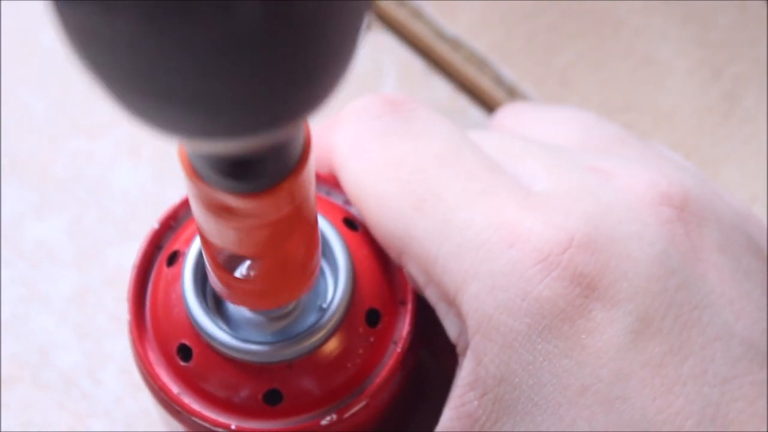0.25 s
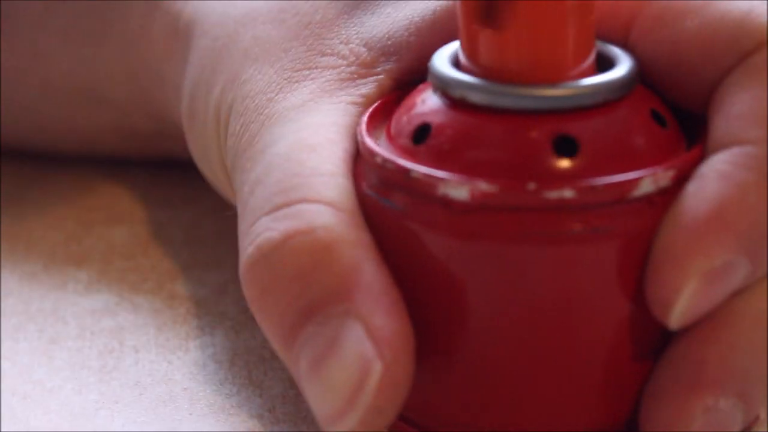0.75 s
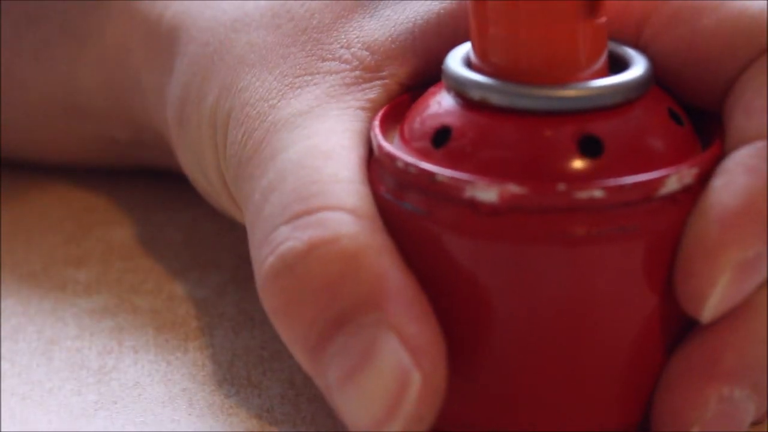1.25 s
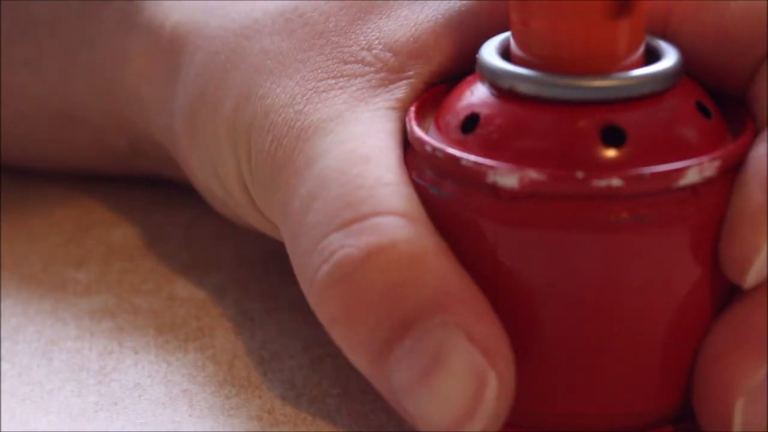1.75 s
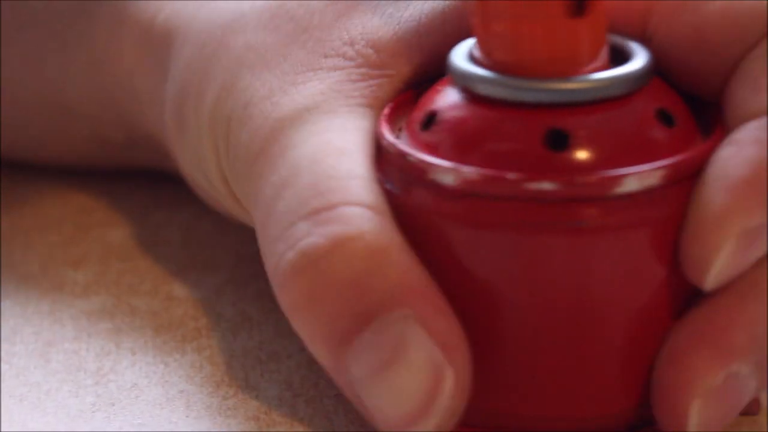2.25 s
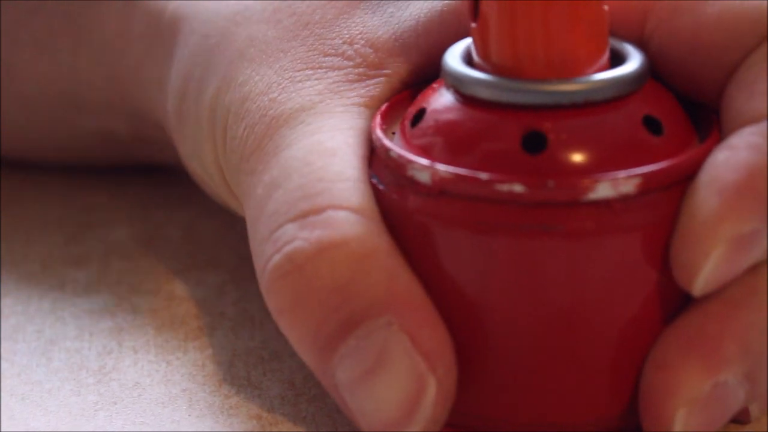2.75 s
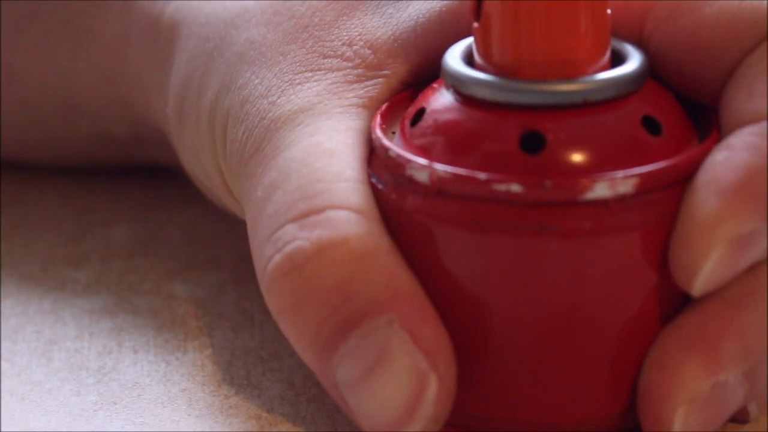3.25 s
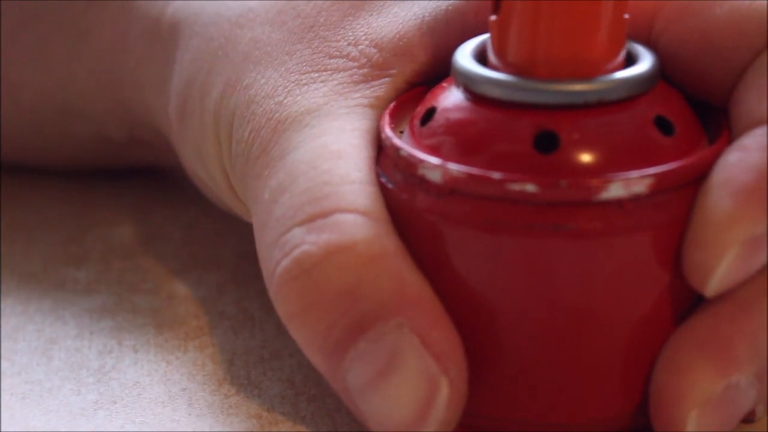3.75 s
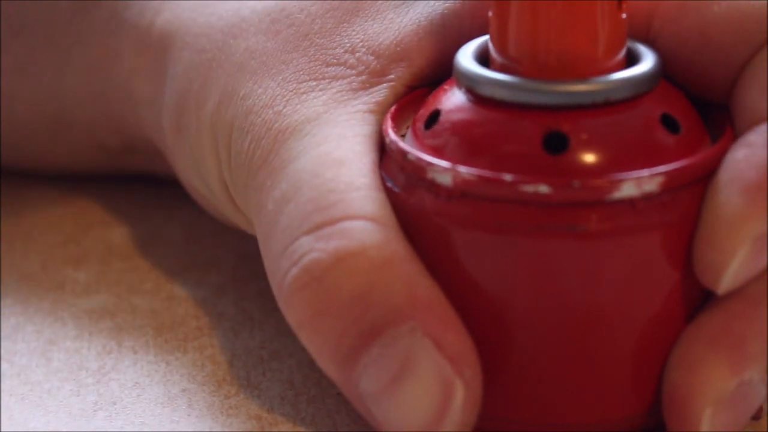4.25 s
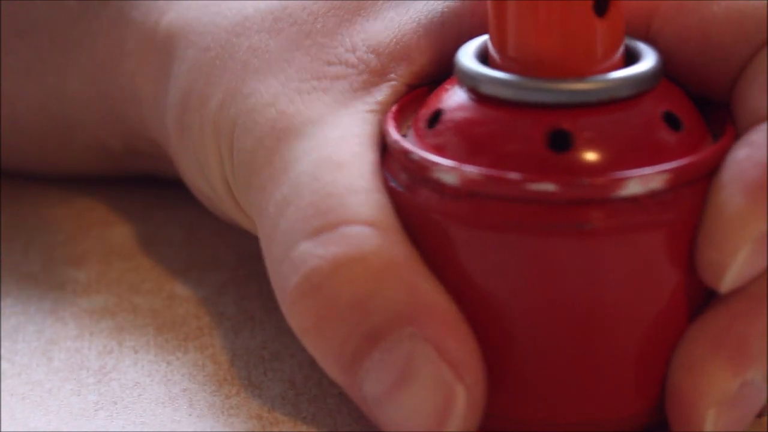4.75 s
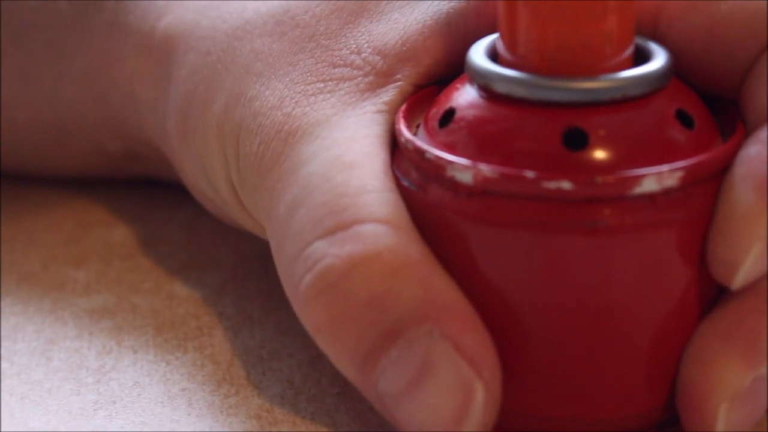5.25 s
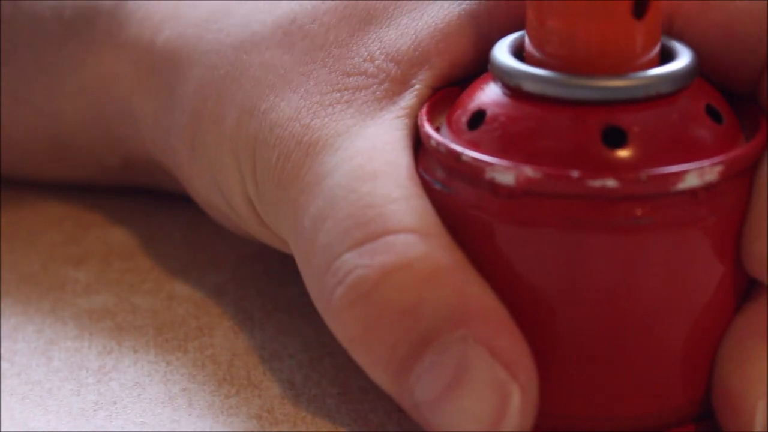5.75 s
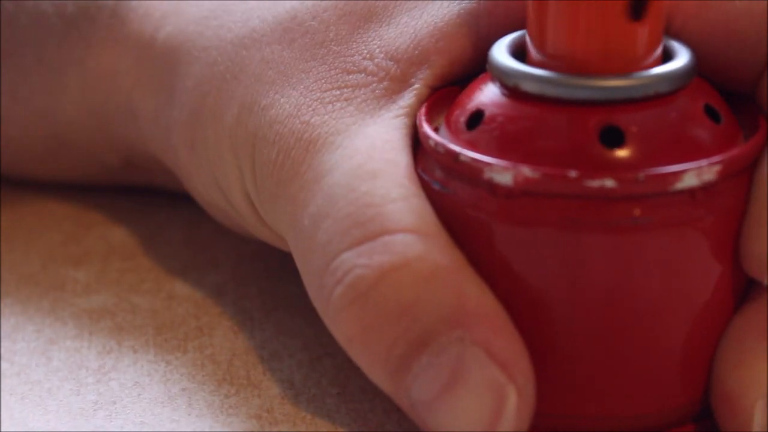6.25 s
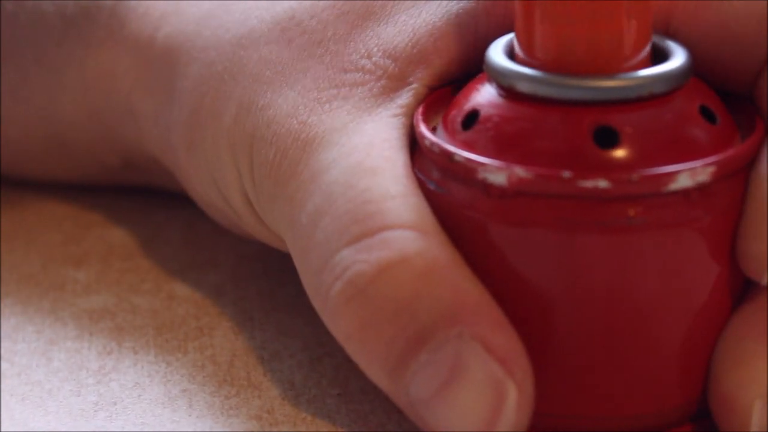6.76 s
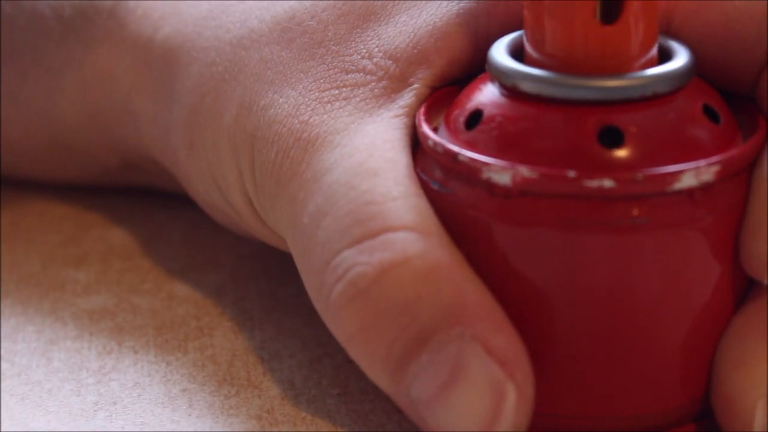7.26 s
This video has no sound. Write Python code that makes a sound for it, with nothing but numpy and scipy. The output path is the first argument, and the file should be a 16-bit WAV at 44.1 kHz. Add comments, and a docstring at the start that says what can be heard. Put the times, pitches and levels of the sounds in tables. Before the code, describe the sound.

Close to the microphone in a small, fairly dry room, a cordless drill revs up quickly from 0 s, its gear whine climbing to a bright, free-spinning pitch. Around 0.4-0.55 s a rough drone swells, snags clack and the pitch drops as the sound shifts leftward. From 0.55 to 2.3 s the hole saw grinds a thin metal can under load: loud wavering whine, gear rattle, gritty scrape and hollow rumble, with snags near 1.55 and 1.63 s and a hard clack at 2.32 s. A lighter pull winds down by 2.75 s. Until 4.8 s there are only quiet creeping scrapes, ticks and scattered metallic clicks, stronger near 3.95, 4.4 and 4.6 s. A short whir runs 4.85-5.45 s, ending in a sharp crack. From 5.6 s a last pull rises slowly, peaks around 6.2 s, then sags into a low, rough growl to 7.5 s, with dull table bumps.

```python
"""Hole saw in a can lid

A cordless drill turns a hole saw at the top of a thin metal can held on a table, close to the microphone.
First shot: the saw spins free. After a cross-fade to a second shot it cuts under load.
Brief nudges and further light trigger pulls follow; snagging teeth are bursts of decaying noise bands.
Motor speed and load set gear whine, rattle, scrape and rumble: whine and shaft are sines locked to the
motor angle; rattle, rumble and scrape are shaped noise and grains."""
import sys
import numpy as np
from scipy import signal
from scipy.fft import rfft, irfft
from scipy.io import wavfile

SR = 44100
rng = np.random.default_rng(int(sys.argv[2]) if len(sys.argv) > 2 else 0)


def master(y):
    """Save y as 16-bit WAV."""
    cut = np.clip(np.atleast_2d(y).T, -1, 1)
    pcm = np.round(cut * 32767)  # scale
    wavfile.write(sys.argv[1], SR, pcm.astype(np.int16))


N = 330750
TIME = np.arange(N) / SR

# Trigger held down, one table a surge from sag to sag. Each row: time in seconds, gear mesh in Hz, load in dB.
HARD_PULLS = [
    [(0.0, 601.3, 1.5), (0.05, 803.6, 6), (0.114, 1460, 5.5), (0.19, 1845, 1), (0.32, 2022, 0),
     (0.44, 2023, -4), (0.535, 1750, -1.5), (0.55, 1282, 6)],
    [(0.55, 1272, 9.5), (0.57, 1215, 4), (0.64, 1201, 5), (0.73, 1419, 0.5), (0.81, 1572, 0.5),
     (0.915, 1473, 1.5), (1.014, 1646, -1), (1.2, 1390, 1.5), (1.3, 1395, 1.5), (1.388, 1449, 0.5),
     (1.452, 1101, 2.5), (1.54, 961.5, 6.5), (1.58, 1097, 3), (1.632, 1001, 7)],
    [(1.632, 992, -7), (1.7, 1337, 2), (1.784, 1381, 1), (1.888, 1451, 1.5), (1.97, 1353, 1.5),
     (2.15, 1217, 5), (2.26, 1126, 5), (2.31, 830, 5)],
]
# Light trigger pulls, one table a pull. Each row: time in seconds, gear mesh in Hz, load in dB.
LIGHT_PULLS = [
    [(2.36, 1118, -4.5), (2.418, 1066, -0.5), (2.49, 1143, -2.5), (2.57, 1311, -3), (2.614, 1111, 0),
     (2.67, 961, -5), (2.71, 291.6, -4), (2.76, 30.1, -9)],
    [(4.84, 29.7, 14), (4.91, 761, -3), (5.03, 905, -1), (5.08, 1086, -4), (5.17, 1116, 1.5),
     (5.254, 1043, -1), (5.36, 815, 3.5), (5.42, 332, 3.5), (5.46, 173, 5)],
    [(5.61, 130, 11), (5.7, 444.5, 4.5), (5.82, 568.4, 1), (6.05, 1054, -3), (6.2, 1222, -3),
     (6.32, 1218, -1.5), (6.464, 1128, -0.5), (6.612, 1066, -1), (6.7, 960.5, -0.5), (6.8, 763.5, 1.5),
     (6.98, 536, 2.5), (7.28, 528, 3), (7.42, 619, 3), (7.5, 500, -2.5)],
]
# Teeth snagging on the rim. Each row: start in seconds, strength in dB, brightness in dB per octave,
# clack in Hz, extra ring in dB.
SNAGS = [(0.4133, -23.5, -3.5, 4063, -2), (0.4974, -18.5, 0, 1940, -6), (1.3122, -29, 2, 2620, 13.5),
         (1.4059, -29, 2.5, 2586, 14), (1.5481, -19, 0.5, 2048, -6), (1.6307, -13.5, -0.5, 3860, -6),
         (1.701, -24.5, 2.5, 2580, 7.5), (1.8831, -26.5, 1.5, 2670, 7.5), (2.2314, -28, -0.5, 2380, 4),
         (2.3212, -11.5, 0.5, 3670, -7), (2.545, -25, -2.5, 2581, -5), (2.6021, -28, 4.5, 2424, 4.5),
         (2.641, -30.5, -4.5, 2450, -4), (2.8143, -47, -7.5, 1900, 5), (2.828, -39, 2, 3270, 1),
         (2.8602, -33.5, 3.5, 2490, 8.5), (2.8674, -27.5, 3, 2590, -1), (2.9796, -32, 1.5, 2770, -2),
         (2.9933, -29, 1, 1940, 8), (3.1744, -40.5, -4.5, 2680, -1.5), (3.5184, -34, 3, 4460, 2.5),
         (3.539, -33.5, 2, 2700, 3), (3.6281, -50, -3, 2550, 8), (3.747, -40.5, -5.5, 1900, -4),
         (3.8062, -47, 4, 2450, 9), (3.819, -32.5, 1.5, 2620, -2), (3.8348, -28, 1, 2070, 3),
         (3.8645, -40, 1, 2530, -4), (3.9445, -19.5, 0, 2140, -4), (3.9658, -25, 6.5, 2590, 9.5),
         (3.9836, -28, -3.5, 2430, 1), (4.0865, -41, 1.5, 2820, -6), (4.3778, -22, 0, 2236, 0.5),
         (4.563, -33.5, -1, 2500, 3), (4.587, -25, 1, 4780, -3), (4.6015, -20.5, 0, 2960, -5),
         (4.76, -26, 3, 4000, -1.5), (4.811, -22, 0.5, 2520, -5), (4.8502, -24.5, 3.5, 1990, 1.5),
         (4.914, -23.5, -1.5, 2870, -1), (4.931, -29, -6, 2560, 5), (4.9382, -22, 6.5, 2020, 9),
         (4.9815, -36.5, 9.5, 2520, 11), (5.4705, -22, -1, 2478, -6), (5.474, -15, 3.5, 2680, 2.5),
         (5.5257, -27.5, -1.5, 1946, -9), (6.1024, -33.5, 5, 2729, -12), (6.1741, -28, 1.5, 3739, 1),
         (6.7057, -28.5, 0.5, 2678, 0), (6.8752, -40.5, 5.5, 2622, 15.5), (6.8977, -33, -4, 2710, 1.5),
         (7.0996, -31.5, 2, 2468, -3)]
# What a snag shakes: clack, ring, thump, body note, ping, crack, table. Each row: band edge over centre
# (a ratio, at least 1.05 in use), t60 in seconds, tail t60 in seconds, tail in dB, level in dB.
SNAG_PARTS = [(1.42, 0.0086, 0.2, -15, -14), (1.26, 0.018, 0.21, -15, -10), (1.64, 0.035, 0.14, -23, -17),
              (1.04, 0.064, 0.075, -18, -23), (1.21, 0.0069, 0.12, -22, -26),
              (1.3, 0.0046, 0.063, -35, -27), (1.71, 0.075, .22, -15, -22)]
# Gear rattle in the housing, slow and fast. Each row: frequency in Hz, relative density in dB per Hz.
GEARS_SLOW = [(410, -41), (700, -15.5), (967, -12), (1090, 1), (1230, -5), (1410, -4.5), (1630, -10),
              (1790, -6.5), (2150, -11.5), (2290, -4.5), (2630, -1), (3070, -10.5), (3630, -8.5),
              (4040, -30), (4400, -19), (5720, -40), (9680, -120)]
GEARS_FAST = [(410, -25), (700, -5.5), (930, -8.5), (1180, 0), (1300, -8.5), (1380, -1.5), (1730, -3.5),
              (2240, -4.5), (2630, -1), (3020, -10.5), (4400, -11), (5720, -7), (9680, -120)]
# Resonances of the can. Each row: frequency in Hz, relative density in dB per Hz.
CAN_BODY = [(18, -53), (30, -25), (76, -14), (118, -1), (156, -5), (198, 2), (252, -2.5), (319, -2),
            (357, -7), (411, -4.5), (459, 4.5), (574, -4), (689, 0.5), (793, -0.5), (850, 0.5), (1100, -12),
            (1870, -120)]
# Scraping teeth, loaded and running free. Each row: frequency in Hz, relative density in dB per Hz.
SCRAPE_LOADED = [(2240, -11), (3800, 2.5), (3920, -1), (4130, 0.5), (4610, -0.5), (4980, 0.5), (5390, 0),
                 (5930, -5.5), (6930, -7), (9090, -11.5), (13600, -29), (14800, -22.5), (16000, -58)]
SCRAPE_FREE = [(2240, -11), (3800, -9), (3940, -10), (4260, -13.5), (5230, -7), (6220, -2.5), (7060, -9.5),
               (7870, -10), (10900, -19.5), (11700, -21), (12700, -25), (15200, -22), (16000, -29)]
# Singing rim of the can. Each row: frequency in Hz, relative density in dB per Hz.
RIM = [(300, -51), (850, -9), (1140, 9.5), (1500, -15), (2000, -5.5), (2650, -1.5), (3600, -29.5),
       (6000, -13)]
# Quiet room noise. Each row: frequency in Hz, relative density in dB per Hz.
ROOM_TONE = [(15, -43), (25, -17), (200, 3.5), (363, -1.5), (489, -2), (575, 0.5), (863, -2), (1650, -5),
             (2000, -3.5), (2760, -8.5), (6740, -12.5), (8360, -10.5), (11300, -21.5), (13600, -17),
             (16000, -29)]
# Housing hum near the microphone. Each row: frequency in Hz, relative density in dB per Hz.
HUM = [(160, -7), (200, 2.5), (240, -5), (290, -12), (370, -1), (430, -4)]
# Its level. Each row: time in seconds, level in dB.
HUM_LEVEL = [(0, -56), (.05, -49.5), (.22, -47), (.39, -43.5), (.43, -35.5), (.5, -30.5), (.56, -99)]
# Mesh tones and the sidebands of uneven gear teeth. Each row: offset in motor turns, then dB at mesh
# harmonics 1, 2, 3, 4.
SIDEBANDS = [(-2, -35, -8.5, -28, -21), (-1, -3.5, 0, -0.5, -10), (0, 5, 6.5, 9.5, -13),
             (1, -39, -9.5, -54, 11)]
# How well the housing radiates the whine. Each row: frequency in Hz, gain in dB.
HOUSING = [(500, -19.5), (800, -11), (1100, 0), (1380, -2.5), (1600, -7.5), (2100, -3.5), (2600, 1),
           (3050, -5), (3600, -2.5), (4400, -0.5), (6000, -8), (8000, -23)]
# Brief taps on the trigger, the saw creeping round the rim. Each row: start in seconds, length in seconds,
# relative level in dB.
NUDGES = [(2.813, 0.066, -48.5), (2.917, 0.21, -52.5), (3.469, 0.26, -59.5), (3.784, 0.14, -49),
          (3.911, 0.14, -48.5), (4.477, 0.19, -45.5), (4.738, 0.28, -47)]
# The can bumps on the table. Each row: start in seconds, relative level in dB.
BUMPS = [(0.41, -49), (0.45, -30), (0.487, -43), (0.669, -30), (4.545, -35), (4.92, -26), (4.939, -23),
         (5.518, -33.5), (5.829, -31.5), (5.999, -38), (6.167, -30)]
# Side balance beside the can. Each row: frequency in Hz, left minus right in dB.
BALANCE_DB = [(60, -3), (110, -5.5), (200, -5.5), (380, -8), (700, -6.5), (1290, -5.0), (2380, -5.5),
              (4400, -2), (8120, -2), (15000, -1)]
# Decay of the room. Each row: frequency in Hz, t60 in seconds.
ROOM_T60 = [(150, 0.25), (1200, 0.11), (5000, 0.17), (14000, 0.27)]
# How each layer grows with the drive. Each holds: dB at cruising speed with no extra load, dB per octave of
# speed, dB per dB of load.
RATTLE_LAW = (-35.5, 10.46, 0.69)
RUMBLE_LAW = (-43.5, 9.2, 0.6)
SCRAPE_LAW = (-42.5, 15.6, 1.05)
WHINE_LAW = (-43.5, 9.5, 0.86)
SHAFT_LAW = (-54, 19.6, 0.16)

MESH_TEETH, CRUISE_MESH_HZ = 8, 1100
HARD_MESH_DB, LIGHT_MESH_DB = (4.5, 0.5, -5.5, -12.5), (1, -11.5, -12)  # mesh harmonics 1, 2, 3, (4)
SHAFT_DB = (-2.5, -7)  # motor unbalance at 1 and 2 times a turn
RING_HZ, THUMP_HZ, BODY_HZ, PING_HZ, CRACK_HZ, TABLE_HZ = 1127, 638, 469.6, 5040, 8500, 145
PIVOT_HZ = 1700  # snag brightness tilts about this
NUDGE_RAMP_S, NUDGE_RUMBLE_DB, NUDGE_SCRAPE_DB = 0.033, -4, -15
# The saw spins free in the first shot, with these layers weaker; from CUT_S it cuts under load.
CUT_S, CUT_RAMP_S = 0.561, 0.025
FREE_RUMBLE_DB, FREE_SHAFT_DB, FREE_WHINE_DB = 7, 17, 5.5
ROOM_TONE_DB, EDGE_HZ = -60.5, 16100


def amp(db):
    """Decibels to gain."""
    return 10 ** (np.asarray(db) / 20)


def unit(x):
    """Scales to rms 1."""
    return x / np.sqrt(np.mean(x ** 2) + 1e-20)


def read(points, hz):
    """Reads a spectrum on a log-frequency axis."""
    f, value = np.transpose(points)
    return np.interp(np.log(hz + 1), np.log(f + 1), value)


def curves(rows):
    """Each column of a table as a curve over the whole time."""
    s, *columns = np.transpose(rows)
    return [np.interp(TIME, s, c) for c in columns]


def colour(x, spectrum):
    """Gives x a spectrum, with steep skirts beyond its ends, at rms 1."""
    hz = np.fft.rfftfreq(N, 1 / SR)
    low_hz, high_hz = spectrum[0][0], spectrum[-1][0]
    skirts = 1 / np.sqrt((1 + (low_hz / (hz + 1)) ** 16) * (1 + (hz / high_hz) ** 24))
    return unit(irfft(rfft(x) * amp(read(spectrum, hz)) * skirts, N))


def wander(rate_hz):
    """Random drift, rolled off above a rate, rms 1."""
    hz = np.fft.rfftfreq(N, 1 / SR)
    return unit(irfft(rfft(rng.standard_normal(N)) / (1 + (hz / rate_hz) ** 2), N))


def grains(per_s, spread_db):
    """Sparse tiny impacts, mostly small and a few large, rms 1."""
    size = amp(spread_db * np.minimum(rng.exponential(1, N), 4))
    return unit(size * rng.choice([-1, 1], N) * (rng.random(N) < per_s / SR))


def add(mix, s, sound):
    """Mixes a sound in at a time."""
    part = mix[max(round(s * SR), 0):][:len(sound)]
    part += sound[:len(part)]


def drive_db(law, mesh_hz, load_db):
    """A layer's level from motor speed and the load on the saw."""
    cruise_db, per_octave_db, per_load = law
    return cruise_db + per_octave_db * np.log2(mesh_hz / CRUISE_MESH_HZ) + per_load * load_db


def whine(rows, turns, mesh_hz, level_db, harmonics_db, flutter=0.45):
    """Gear mesh harmonics and their sidebands, fluttering as the teeth take up play, the octave most."""
    start, end = rows[0][0], rows[-1][0]
    running = (TIME > start) & (TIME < end)
    t, angle, out = TIME[running], 2 * np.pi * turns[running], np.zeros(N)
    knots_s = np.arange(0, 8, 1 / 150)
    fade = signal.windows.tukey(len(t), 0.013 / (end - start))
    for k, harmonic_db in enumerate(harmonics_db):
        radiated_db = read(HOUSING, (k + 1) * mesh_hz[running])
        level = fade * amp(level_db[running] + harmonic_db + radiated_db)
        rough = 1.5 if k == 1 else 1
        for offset, *side_db in SIDEBANDS:
            drift = rng.standard_normal(len(knots_s)) + 1j * rng.standard_normal(len(knots_s))
            shake = np.interp(t, knots_s, drift)  # complex: level and phase
            order = (k + 1) * MESH_TEETH + round(offset)
            tone = np.exp(1j * (order * angle + 2 * np.pi * rng.random()))
            out[running] += level * amp(side_db[k]) * (tone * (1 + rough * flutter * shake)).real
    return out


def gears(turns, mesh_hz, level_db, throb=0.085, hiss=0.7, uneven_db=0.84, repeat=0.24, count=64):
    """Teeth knock in the housing, partly the same way at each motor turn; speed evens out its resonances."""
    wear = np.interp(turns, np.arange(count) / count, unit(rng.standard_normal(count)), period=1)
    knocks = grains(3500, 2.3) + hiss * rng.standard_normal(N) + repeat * wear * (1 + 0.5 * wander(11))
    knocks = knocks * (1 + throb * np.cos(2 * np.pi * turns))
    fast = np.clip((mesh_hz - 1100) / 550, 0, 1)
    rattle = (1 - fast) * colour(knocks, GEARS_SLOW) + fast * colour(knocks, GEARS_FAST)
    return rattle * amp(level_db + uneven_db * wander(31))


def shaft(turns, level_db, waver=0.74):
    """The spinning motor shakes the drill once and twice a turn."""
    shake = np.zeros(N)
    for k, db in enumerate(SHAFT_DB):
        shake += amp(db) * np.sin(2 * np.pi * (k + 1) * turns) * (1 + waver * wander(16))
    return amp(level_db) * shake


def hum():
    """A rough drone in the two lowest resonances of the housing."""
    return colour(rng.standard_normal(N), HUM) * amp(curves(HUM_LEVEL)[0])


def rumble(level, lumps_db=2.5):
    """Low noise and grains in the resonances of the can, swelling in lumps as the saw drags."""
    drag = grains(900, 4.3) + 0.94 * rng.standard_normal(N)
    return colour(drag, CAN_BODY) * level * amp(lumps_db * wander(24))


def scrape(turns, mesh_hz, spinning_free, level, throb=0.07, hiss=1.1):
    """Fizz of the saw teeth, tearing tiny chips under load; brighter when the saw spins free or fast."""
    chips = (grains(2500, 1.2) + hiss * rng.standard_normal(N)) * (1 + throb * np.cos(2 * np.pi * turns))
    free = np.maximum(spinning_free, np.clip((mesh_hz - 1450) / 450, 0, 1))
    fizz = (1 - free) * colour(chips, SCRAPE_LOADED) + free * colour(chips, SCRAPE_FREE)
    return fizz * level * amp(0.94 * wander(53))


def room(x):
    """A small room: sparse decaying reflections of random sign, other ones for each side."""
    taps = rng.choice([-1., 1.], (2, SR // 3)) * (rng.random((2, SR // 3)) < 4000 / SR)
    taps[:, :SR // 800] = 0  # gap before the first reflection
    hz, t, z = signal.stft(taps, SR, nperseg=256)
    decay = amp(-60 * t / read(ROOM_T60, hz)[:, None])
    tail = signal.istft(z * decay, SR, nperseg=256)[1]
    tail = tail / np.linalg.norm(tail, axis=1, keepdims=True)
    return signal.fftconvolve(x[None], tail, axes=1)[:, :N]


def background():
    """Quiet room noise, mostly independent on each side."""
    shared = rng.standard_normal(N)
    sides = [colour(shared + 5.0 * rng.standard_normal(N), ROOM_TONE) for _ in range(2)]
    return amp(ROOM_TONE_DB) * np.array(sides)


def bumps(hz=128, t60=0.11, trim_db=-4):
    """The hand rocks the can against the table, which answers with a dull low note."""
    t, out = np.arange(SR // 4) / SR, np.zeros(N)
    for s, db in BUMPS:
        note = np.sin(2 * np.pi * hz * rng.uniform(0.82, 1.17) * t)
        add(out, s, amp(db + trim_db - 60 * t / t60) * (1 - np.exp(-t / 0.001)) * note)
    return out


def snags(strain_db=-10, strain_s=0.0017, hold_s=0.0027):
    """A tooth strains, tears briefly and lets go: a crack, a ring and a thump that reaches the table."""
    t, out = np.arange(-SR // 50, SR // 5) / SR, np.zeros(N)
    age = np.maximum(t - hold_s, 0)
    strain = amp(strain_db) * np.exp(-abs(t) / strain_s)
    for s, strength_db, bright_db, clack_hz, ring_db in SNAGS:
        centres_hz = clack_hz, RING_HZ, THUMP_HZ, BODY_HZ, PING_HZ, CRACK_HZ, TABLE_HZ
        for hz, part in zip(centres_hz, SNAG_PARTS):
            spread, t60, tail_t60, tail_db, part_db = part
            decay = amp(-60 * age / t60) + amp(tail_db - 60 * age / tail_t60)
            envelope = np.where(t < 0, strain, decay)
            spread = np.clip(spread, 1.05, 2.3)
            band = signal.butter(2, [hz / spread, hz * spread], "band", fs=SR, output="sos")
            burst = signal.sosfilt(band, envelope * rng.choice([-1, 1], len(t)))
            burst = burst / np.sqrt(np.sum(burst ** 2) / (0.016 * SR))  # energy of 16 ms at rms 1
            tilt_db = bright_db * np.log2(max(hz, BODY_HZ) / PIVOT_HZ)
            level = amp(strength_db + part_db + tilt_db + ring_db * (hz == RING_HZ))
            add(out, s + t[0], level * burst)
    return out


def nudges():
    """How hard the saw creeps: each tap on the trigger rises, holds and lets go."""
    push = np.zeros(N)
    for s, length_s, db in NUDGES:
        push += amp(db) * np.clip(np.minimum(TIME - s, s + length_s - TIME) / NUDGE_RAMP_S, 0, 1)
    return push


def rim(push):
    """The slowly dragging teeth make the rim of the can sing roughly."""
    return push * colour(grains(1500, 0.63), RIM) * amp(2 * wander(34))


def ticks(push, level_db=-9, per_s=70):
    """Single teeth tick over the burr while the saw creeps."""
    return push * amp(level_db) * colour(grains(per_s, 9), SCRAPE_LOADED)


def scene():
    """Motor speed and load drive whine, rattle, rumble, scrape and shaft, in a small room."""
    mesh_hz, load_db = curves([row for run in [*HARD_PULLS, *LIGHT_PULLS] for row in run])
    judder = 1 + .009 * wander(70)
    turns = np.cumsum(mesh_hz * judder) / MESH_TEETH / SR
    rattle_db, rumble_db, scrape_db, whine_db, shaft_db = (
        drive_db(law, mesh_hz, load_db) for law in (RATTLE_LAW, RUMBLE_LAW, SCRAPE_LAW, WHINE_LAW, SHAFT_LAW))
    spinning_free, push = np.clip((CUT_S - TIME) / CUT_RAMP_S, 0, 1), nudges()

    whine_db = whine_db - FREE_WHINE_DB * spinning_free + 1.3 * wander(18.85)  # the whine flares and fades
    drill = gears(turns, mesh_hz, rattle_db) + shaft(turns, shaft_db - FREE_SHAFT_DB * spinning_free) + hum()
    drill += sum(whine(run, turns, mesh_hz, whine_db, HARD_MESH_DB) for run in HARD_PULLS)
    drill += sum(whine(run, turns, mesh_hz, whine_db, LIGHT_MESH_DB) for run in LIGHT_PULLS)

    dragging = amp(rumble_db - FREE_RUMBLE_DB * spinning_free) + push * amp(NUDGE_RUMBLE_DB)
    can = rumble(dragging) + bumps() + rim(push)
    cutting = amp(scrape_db) + push * amp(NUDGE_SCRAPE_DB)
    teeth = scrape(turns, mesh_hz, spinning_free, cutting) + ticks(push)
    hits = snags()
    scatter = amp(-6.5) * scrape(turns, mesh_hz, spinning_free, cutting)  # spreads the fizz to the sides
    sides = np.array([scatter, -scatter])

    wet = room(amp(-5.5) * drill + amp(-10) * can + amp(-9.5) * teeth + amp(-7.0) * hits)
    return drill + can + teeth + hits + sides + wet + background()


def record(dry):
    """The first shot, from above the can, cross-fades to one from beside it, leaning right; band limit."""
    lean_db = read(BALANCE_DB, np.fft.rfftfreq(N, 1 / SR))
    ports = amp(np.array([lean_db, -lean_db]) / 2)
    leaning = irfft(rfft(dry) * ports / ports.mean(0), N)
    beside = np.interp(TIME, [.4, .55], [.55, 1])  # the first shot leans about half as much
    heard = (1 - beside) * dry + beside * leaning
    low_pass = signal.firwin(511, EDGE_HZ, window=("kaiser", 9), fs=SR)
    return signal.oaconvolve(heard, low_pass[None], "same")


dry = scene()
out = record(dry)
master(out)
```